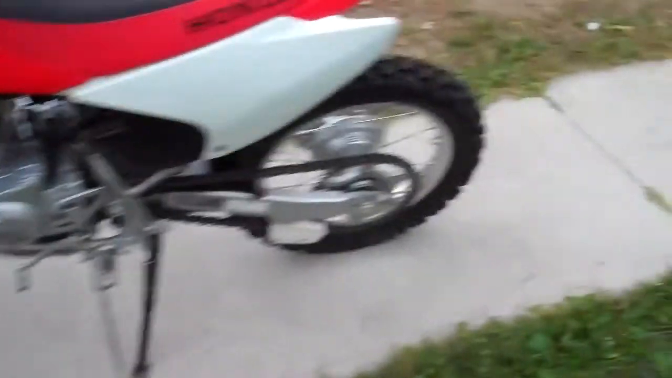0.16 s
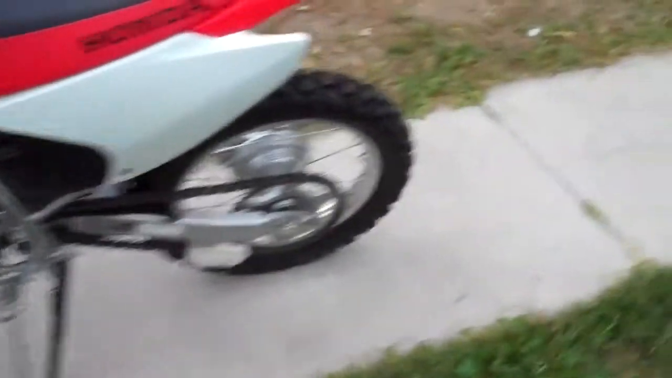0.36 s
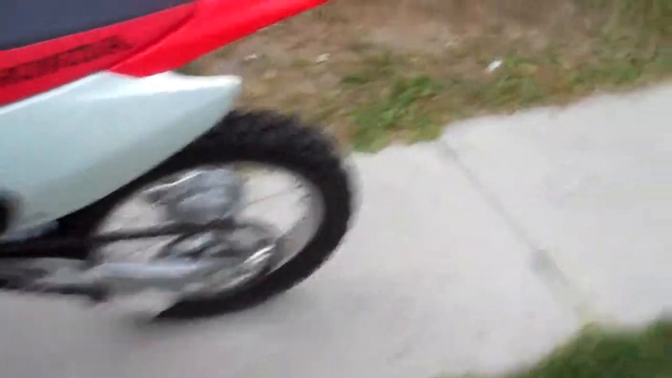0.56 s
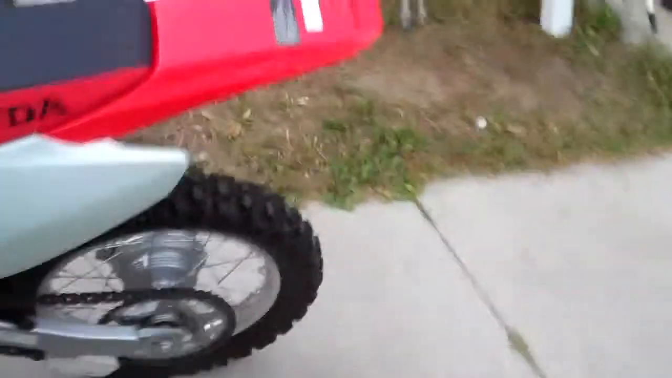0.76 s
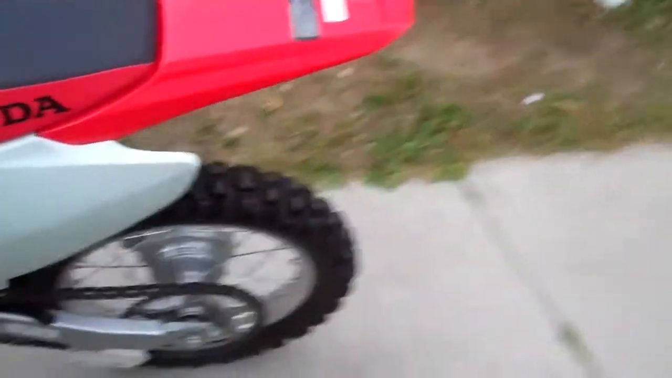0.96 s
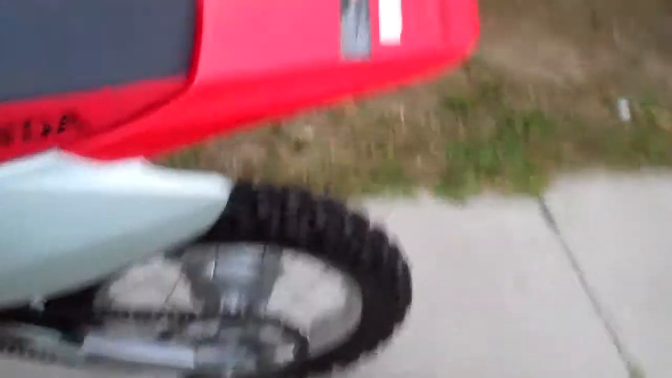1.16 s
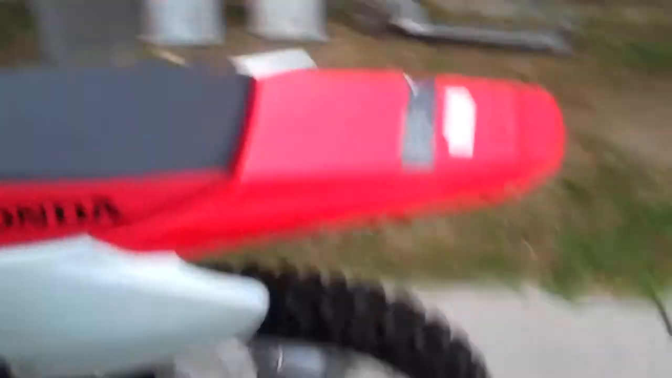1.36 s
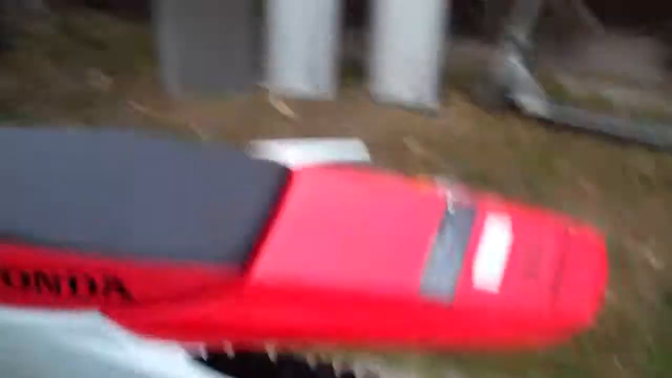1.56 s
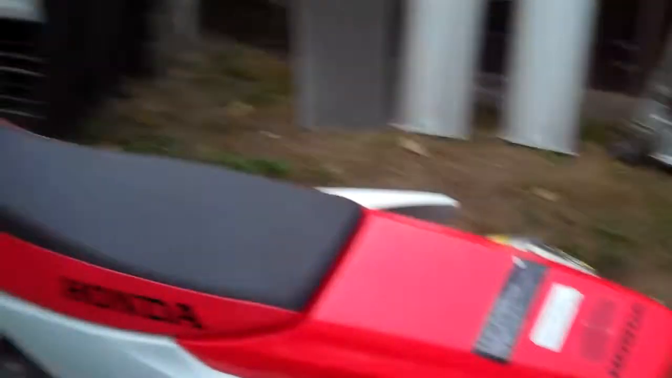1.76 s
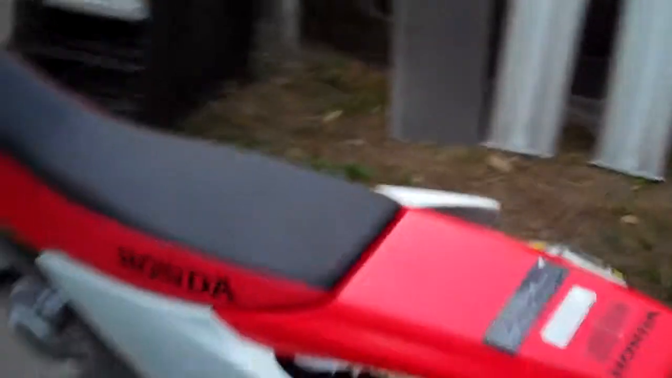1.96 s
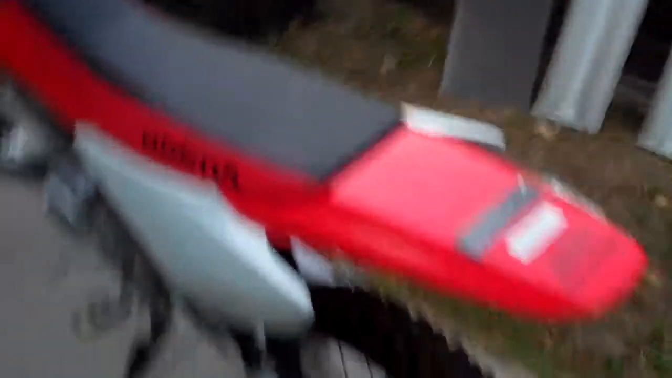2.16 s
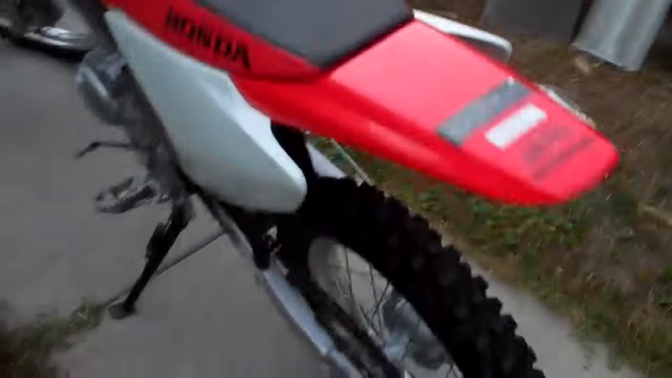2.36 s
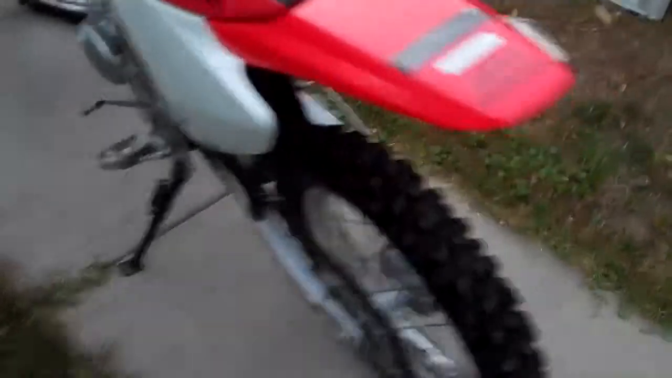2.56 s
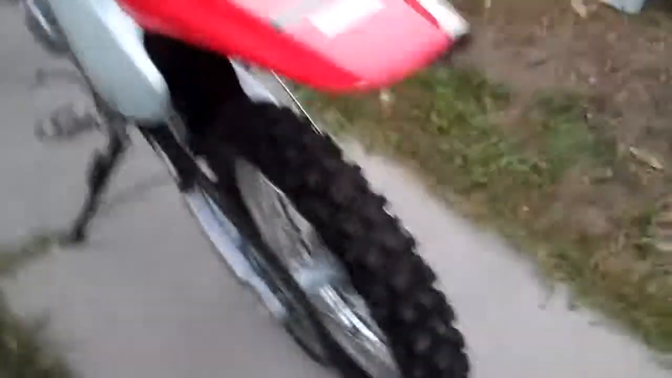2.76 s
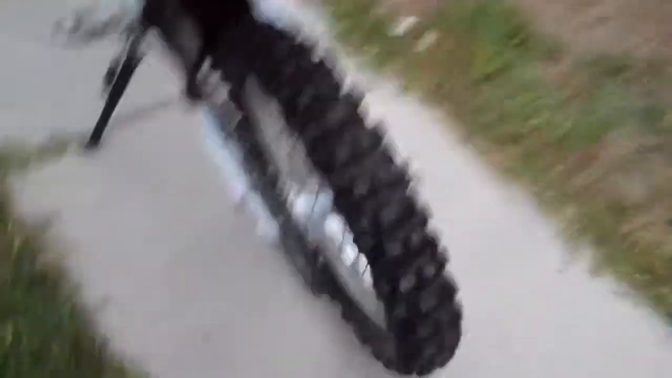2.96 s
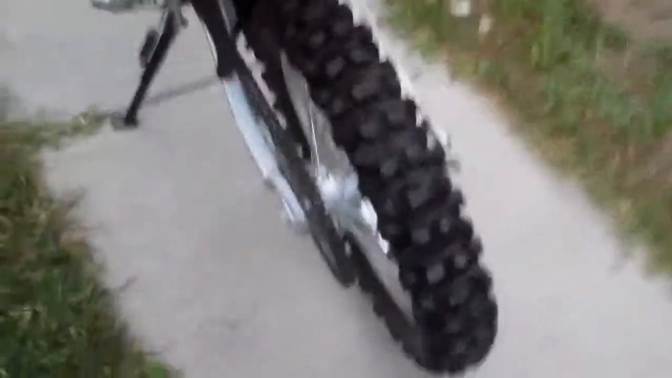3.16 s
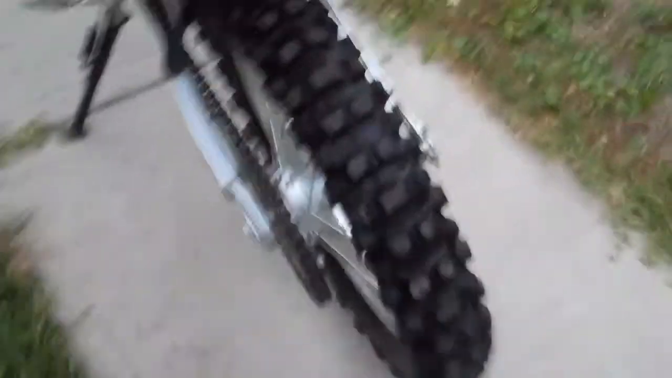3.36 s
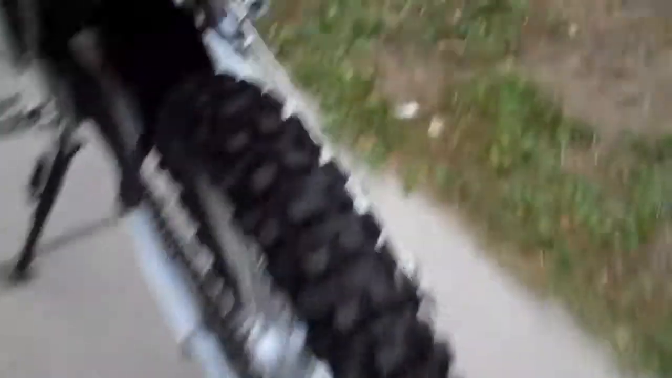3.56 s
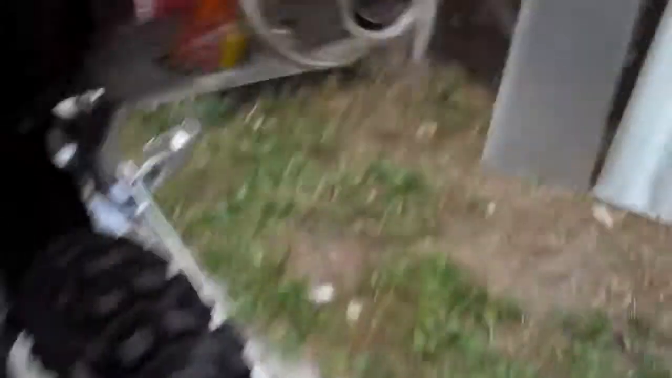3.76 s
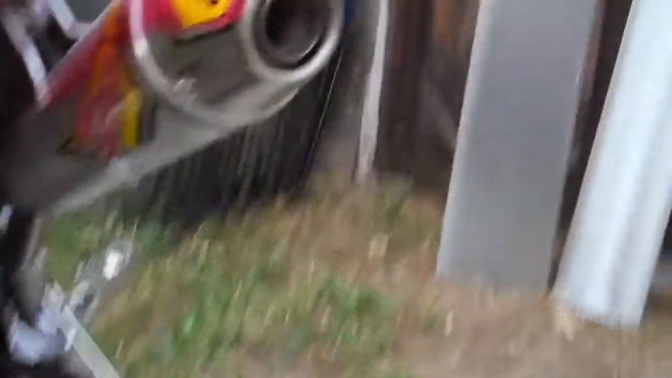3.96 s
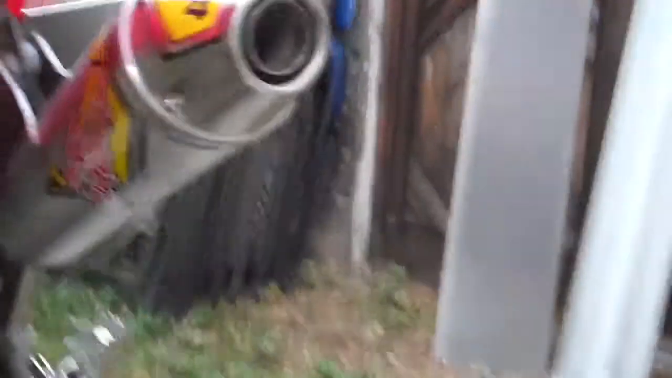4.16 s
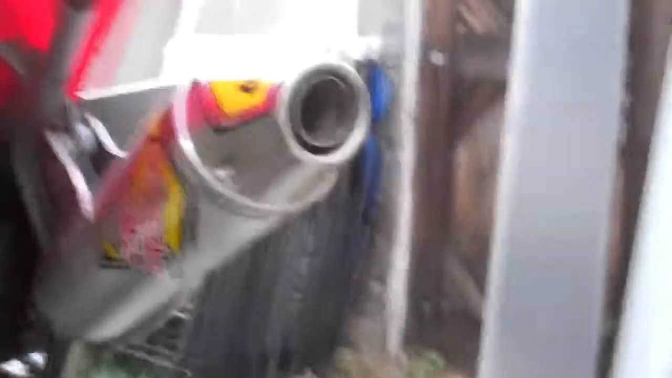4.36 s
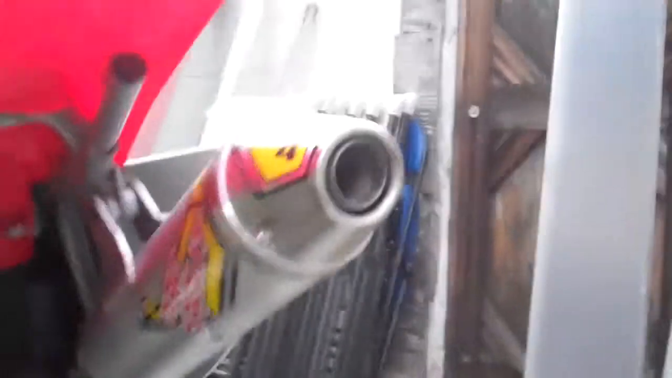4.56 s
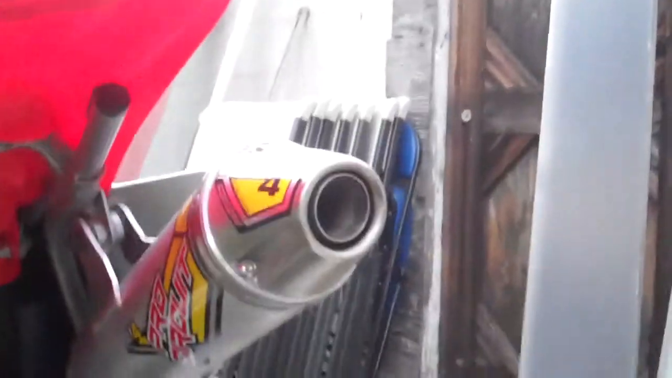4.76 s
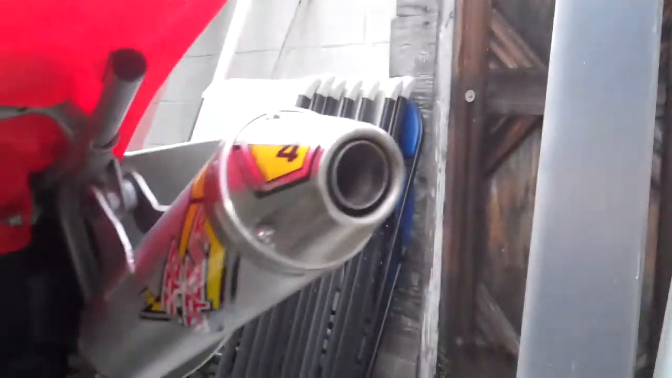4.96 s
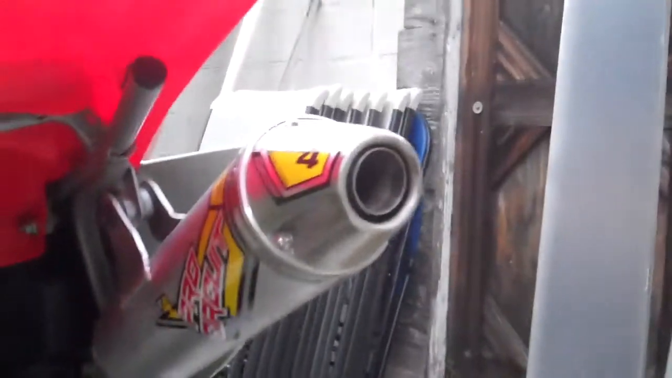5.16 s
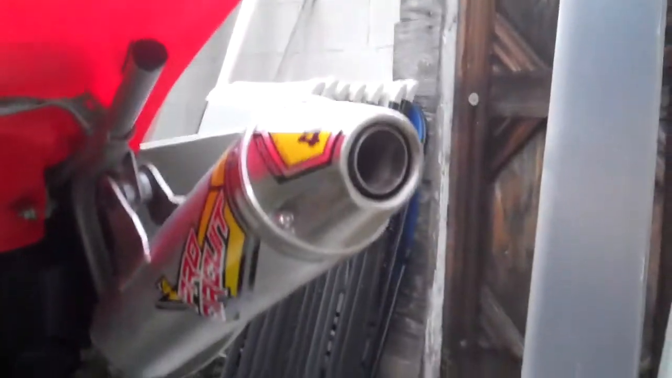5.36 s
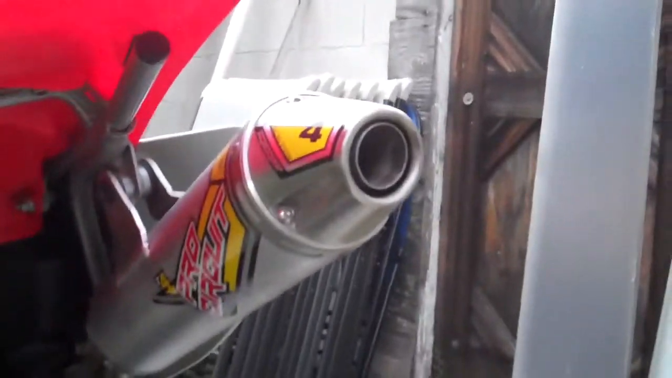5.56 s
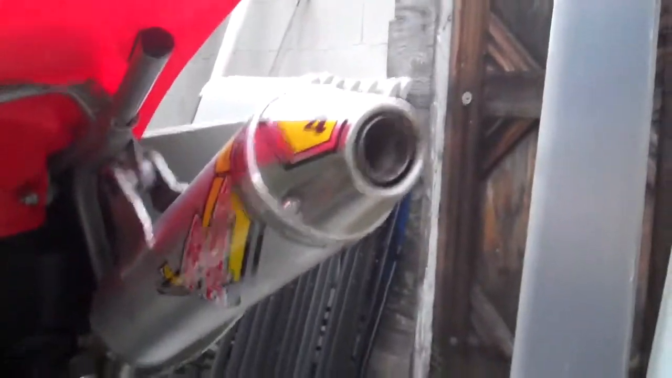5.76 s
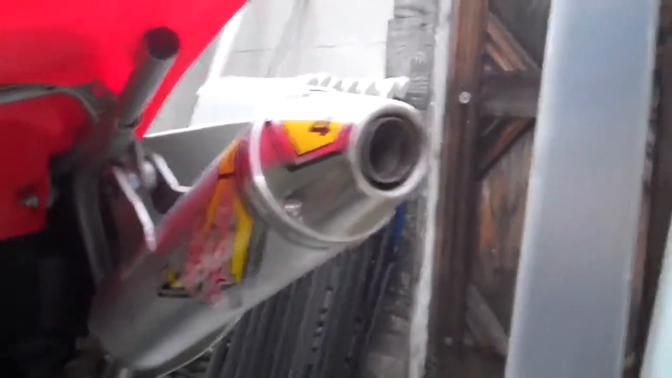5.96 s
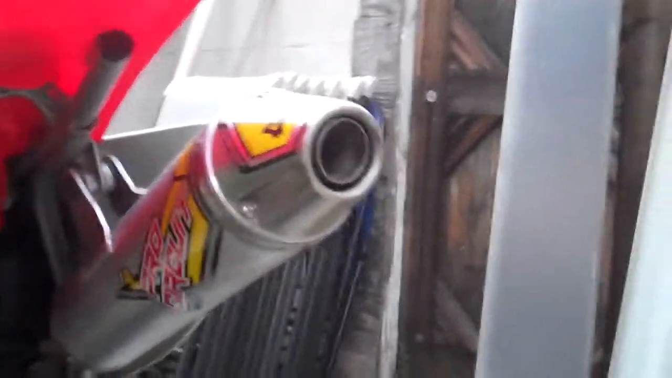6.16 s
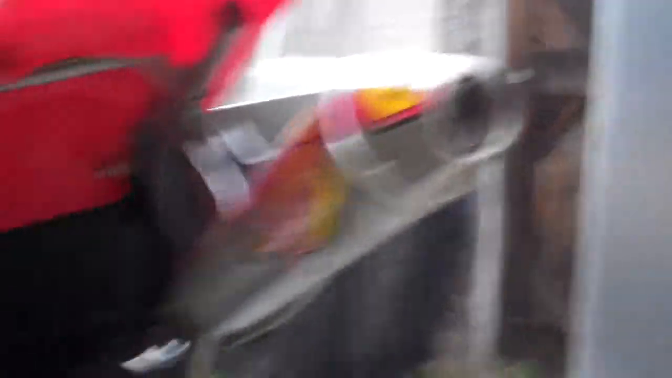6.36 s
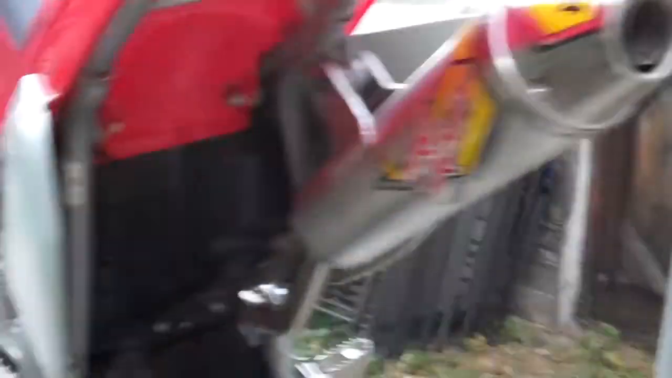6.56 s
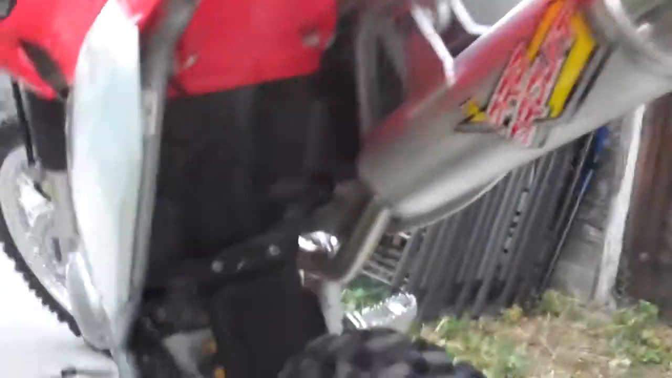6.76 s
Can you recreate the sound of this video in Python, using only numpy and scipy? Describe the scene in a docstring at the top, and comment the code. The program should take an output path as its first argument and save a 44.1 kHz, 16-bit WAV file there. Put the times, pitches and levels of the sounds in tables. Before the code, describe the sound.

Outdoors, a small four-stroke engine putters unevenly, its hollow exhaust beats swelling close by, with light pops and a few shoe scuffs on concrete.

```python
"""On a concrete path, a cold single-cylinder four-stroke idles, heard while walking round it to the silencer.
Each exhaust stroke rings the pipe: a blast when the charge burned, a softer gulp of air when it did not.
Gas hisses and rasps at the outlet, and the valve gear and cases clatter through each cycle.
Late pops and blast echoes knock the silencer shell, while shoes scuff and tap on the path."""
import sys
import numpy as np
from scipy import signal
from scipy.io import wavfile
from scipy.ndimage import uniform_filter1d

SR = 44100
rng = np.random.default_rng(int(sys.argv[2]) if len(sys.argv) > 2 else 0)


def materialize(psi):
    """Save the field psi as 16-bit PCM at rate SR to the path in sys.argv[1].

    A 1-D psi becomes a single channel; in a 2-D psi each row is a channel.
    """
    bounded = np.clip(np.atleast_2d(psi).T, -1, 1)
    quanta = np.round(bounded * 32767).astype(np.int16)
    wavfile.write(sys.argv[1], SR, quanta)


N = 300321

# Ringing notes of the pipe and silencer. Each row: pitch in Hz, relative level in dB, sign at the outlet
# (1 or -1), time to fade by 60 dB in seconds.
PIPE_MODES = [(52.1, -17.1, 1, .137), (81.4, -17.3, 1, .064), (115.3, -20.3, -1, .2), (153.4, -36, 1, .084),
              (263.8, .9, -1, .0368), (276.9, -4, 1, .0688), (320, -17, 1, .075), (366, -22, -1, .17)]
# The walk round the bike. Each row: time in seconds, strength of a full burn in dB, relative outlet hiss of
# such a burn in dB, relative clatter in dB, place from beside the cases (0) to behind the outlet (1).
WALK_ROUND = [(0, -6, -61, -47, 0.67), (.85, -5.5, -52, -48, 0), (1.6, -6.5, -65, -45.5, 0),
              (2.0, -4.5, -57, -45, 0.6), (2.75, -5, -61, -46, 0.38), (3.3, -3, -49, -46, 0.13),
              (3.7, 1, -46, -44, 0.58), (4.05, 4, -40, -44.5, 0.72), (5.0, 2.5, -46, -44, 0.84),
              (6.0, 2.5, -44, -44, 0.77), (6.81, 0.5, -48, -45, 0.77)]
# Broad colour of the clatter. Each row: centre in Hz, width of each filter pass in Hz, relative level from
# beside in dB, relative level from behind in dB.
CASE_COLOURS = [(225, 160, -0.5, -21), (313, 146, 0, -5), (511, 390, -4, -4.5), (810, 370, 6, 4.5),
                (1137, 426, 3, 3), (1500, 405, 2.5, -2), (1910, 870, 0, 2), (2640, 990, 0.5, -2),
                (3320, 2300, 0.5, 1), (3940, 2050, -2, 1), (5500, 790, -11, -27), (7160, 2300, -16, -40),
                (9150, 6500, -13, -21), (13000, 9700, -19.5, -19.5)]
# Clatter through one cycle. Each row: share of the cycle since the exhaust valve opened (0 to 1),
# relative level in dB.
CYCLE_LEVELS = [(0, 1.5), (.14, 2.5), (.22, -1), (.4, 1.5), (.5, 0), (.75, -1), (.84, -2.5), (.9, 4)]
# Late pops of unburned charge in the silencer. Each row: start in seconds, relative strength in dB.
LATE_POPS = [(2.106, -46), (3.499, -34), (3.915, -28.5), (4.121, -40), (4.361, -32.5), (5.86, -31.5),
             (6.083, -34.5)]
# Exhaust strokes after a burn. Each row: valve opening in seconds, strength in dB.
BURN_STROKES = [(0.1744, -11.5), (0.398, -12), (0.6114, -11), (0.823, -9), (1.04, -8), (1.2521, -8.5),
                (1.361, -7), (1.5786, -6), (1.6732, -23), (1.785, -6.5), (1.8845, -13.5), (1.9946, -6),
                (2.2162, -6), (2.321, -7.5), (2.435, -5.5), (2.6526, -6), (2.7519, -9.5), (2.8602, -5),
                (2.9597, -5.5), (3.0638, -4.5), (3.1733, -6), (3.285, -4.5), (3.3902, -3.5), (3.6096, -2.5),
                (3.7022, -3), (3.8039, -0.5), (4.026, 1.5), (4.1367, 0.2), (4.2466, 1.5), (4.348, -3),
                (4.455, 1.5), (4.5653, -20), (4.6679, 1.5), (4.8901, 0.7), (5.1096, 1), (5.2074, -1.5),
                (5.3122, 1), (5.4161, -4), (5.53, 1), (5.6316, -14), (5.7487, 0), (5.9709, 0.8),
                (6.071, -3.5), (6.1765, -1.0), (6.2818, -9), (6.398, 0.1), (6.5017, -14), (6.6173, -0.7)]
# Exhaust strokes after a misfire, with air drawn back up the pipe. Each row: valve opening in seconds,
# strength in dB.
MISFIRE_STROKES = [(0.0465, -17.5), (0.278, -15.5), (0.495, -15.5), (0.709, -12), (0.9242, -14),
                   (1.1364, -13.5), (1.4594, -20), (2.0955, -12), (2.5344, -15), (3.492, -9),
                   (3.9058, -3.5), (4.767, -22), (4.992, -3.5), (5.8521, -4.5), (6.7133, -7.5)]
# Covers and fins that ring when the valve gear knocks. Each row: pitch in Hz, time to fade by 60 dB in
# seconds, relative level from beside in dB, relative level from behind in dB.
FIN_MODES = [(361, 0.045, -3, 0), (783, 0.075, 2, -16.5), (1024, 0.051, -13, 1), (1175, 0.079, -34, 3),
             (1530, 0.16, -32, -12), (1964, 0.078, -5.5, -10), (2488, 0.073, -16, -10.5),
             (2890, 0.2, -27, -12), (3262, 0.047, -3, -8.5), (3610, 0.019, -7, -8),
             (4440, 0.079, -10, -18.5), (5250, 0.059, -32, -10)]
# Ringing notes of the silencer shell. Each row: pitch in Hz, relative level in dB, time to fade by 60 dB
# in seconds.
SHELL_MODES = [(530, -8.5, 0.06), (774, -5.5, 0.054), (946, 0.5, 0.025), (1223, -9, 0.06),
               (1787, -9, 0.036)]
# Shoes dragged on concrete. Each row: start in seconds, relative level in dB, pitch of the scrape in Hz.
SHOE_SCUFFS = [(0.604, -45, 700), (1.933, -36.5, 306), (2.708, -41.5, 706), (3.386, -38, 1030)]
# Heels set down. Each row: start in seconds, relative level in dB, length in seconds.
HEEL_TAPS = [(0.819, -42.5, 0.031), (3.278, -44.5, 0.025), (3.383, -28, 0.012)]

BLAST_S, GULP_S = .0046, .0063  # length of each pressure pulse, seconds
# hiss lost per dB a burn falls short of full, the most it can lose, and the relative hiss of a gulp
HISS_DB_PER_DB, HISS_LOSS_DB, GULP_HISS_DB = 3, 28, -6
MURMUR_DB_PER_DB = 0.56  # growth of the pipe murmur per dB of a full burn
CRACK_DB, CRACK_S = -17, .0035  # bright crack of a pop against its knock, and its decay time constant
SCUFF_S, GRIT_RATIO, GRIT_DB = .16, 2.78, -2.5  # scuff length; grit pitch and level against the sole
TAP_HZ = 1000
TOP_HZ = 14350  # upper edge of what the microphones pass


def undb(db):
    """Gain of a level in dB."""
    return 10 ** (np.asarray(db) / 20)


def unit(x):
    """Scaled to an average (rms) strength of 1."""
    return x / np.sqrt(np.mean(x ** 2))


def ring(x, hz, t60):
    """One note struck by x, fading by 60 dB in t60 seconds."""
    pole = np.exp((2j * np.pi * hz - np.log(1000) / t60) / SR)
    return signal.lfilter([1], [1, -pole], x).imag


def band(x, hz, width):
    """Resonance with gain 1 at its centre."""
    return signal.lfilter(*signal.iirpeak(hz, hz / width, fs=SR), x)


def steep(x, hz, width):
    """The same resonance twice, so that little is left far from its centre."""
    return band(band(x, hz, width), hz, width)


def walk(rate):
    """Random wander: about rate new values a second, joined by straight slopes."""
    hold = int(SR / rate)
    steps_held = np.repeat(rng.standard_normal(N // hold + 1), hold)
    return uniform_filter1d(steps_held, hold)[:N]


def grit(scatter_db):
    """Dense small impacts of uneven size."""
    sizes = undb(scatter_db * rng.exponential(size=N))
    return unit(rng.standard_normal(N) * sizes)


def spread(mid, side, share):
    """Two channels that share mid and differ by side."""
    return (mid + share * side * np.array([[1], [-1]])) / np.sqrt(1 + share ** 2)


def apart(hz):
    """The two microphones agree in the bass and part in the treble."""
    return np.clip((hz / 7000) ** 0.79, .08, .75)


def pulse(n):
    """Smooth push of n samples whose total stays near 1 whatever its length."""
    return np.hanning(n) * 2 / n


def exhaust(full_db, hiss_db):
    """Pressure pulses ring the pipe; the flow at the outlet shapes the hiss and a rasp of the silencer."""
    push, jet = np.zeros(N), np.zeros(N)
    strokes = [(*row, 1, BLAST_S) for row in BURN_STROKES]
    strokes += [(*row, -1, GULP_S) for row in MISFIRE_STROKES]
    murmur_db = MURMUR_DB_PER_DB * full_db
    for s, db, sign, length in sorted(strokes):
        i, n = int(s * SR), int(length * SR)
        push[i:i + n] += sign * undb(db) * pulse(n)

        # a weak burn hisses far less than a full one
        over_db = db - full_db[i]
        if sign > 0:
            change_db = np.clip(HISS_DB_PER_DB * over_db, -HISS_LOSS_DB, 3)
        else:
            change_db = GULP_HISS_DB + over_db
        # the flow already carries the strength of the stroke, so take it off here
        jet[i:] = undb(hiss_db[i] + change_db - db)

        # the rising piston then shoves out what a weak stroke left in the cylinder
        spent = undb(over_db) if sign > 0 else 0
        left_over = np.clip(1 - spent, 0, 1)
        j, n = int((s + length + 0.011) * SR), int(0.015 * SR)
        push[j:j + n] += left_over * undb(murmur_db[i] - 13) * pulse(n)

    # eddies in the pipe keep its notes murmuring
    eddies = undb(murmur_db - 56 + 4.5 * walk(11)) * steep(rng.standard_normal(N), 81, 104)
    boom = sum(sign * undb(db) * ring(push + eddies, hz, t60) for hz, db, sign, t60 in PIPE_MODES)

    # gas leaving the outlet hisses more than air drawn back in
    swing = signal.sosfilt(signal.butter(2, 60, "high", fs=SR, output="sos"), boom)
    flow = uniform_filter1d(np.where(swing > 0, swing, -.6 * swing), size=120)
    hiss = undb(28.0) * steep(rng.standard_normal((2, N)), 5300, 13000) * flow * jet
    hiss = spread(*hiss, 0.4) * undb([[.6], [-.6]])  # a little stronger on the left

    # the rasp follows one pipe round trip later
    late_flow = np.roll(flow, int(0.0055 * SR))
    rasp = undb(-4) * steep(rng.standard_normal(N) * late_flow, 850, 890)
    return boom + rasp + hiss


def clatter(t, db, behind):
    """Valve gear, chain and piston knock the cases, hardest just before the exhaust valve opens."""
    opens = np.sort([row[0] for row in BURN_STROKES + MISFIRE_STROKES])
    phase = np.interp(t, opens, np.arange(len(opens))) % 1
    beat_db = np.interp(phase, *np.transpose(CYCLE_LEVELS), period=1) + 1.62 * walk(30)
    wash, bells = 0, 0
    for hz, width, beside_db, behind_db in CASE_COLOURS:
        tone = unit(steep(np.array([grit(1.36), grit(1.0)]), hz, width))
        colour_db = beside_db + behind * (behind_db - beside_db) + 1.34 * walk(25)
        wash = wash + undb(colour_db) * spread(*tone, apart(hz))
    for hz, t60, beside_db, behind_db in FIN_MODES:
        # each part is struck in its own short flurries
        flurry_db = 8.4 * np.tanh(0.54 * walk(60)) + 2.07 * np.clip(beat_db, -9, 4)
        flurry = undb(flurry_db) * rng.standard_normal((2, N))
        colour_db = beside_db + behind * (behind_db - beside_db)
        bells = bells + undb(colour_db) * spread(*unit(ring(flurry, hz, t60)), apart(hz))
    return undb(db) * (undb(beat_db) * unit(wash) + undb(-3.0) * unit(bells))


def pops():
    """Late burns, and the steepened echo of each blast, strike the silencer shell."""
    # a stronger blast steepens more on its way back down the pipe
    echoes = [(s + .0095, 1.62 * db - 34.0) for s, db in BURN_STROKES]
    hits = np.array(LATE_POPS + echoes)
    at = (hits[:, 0] * SR).astype(int)
    # every hit stirs the notes of the shell in its own mixture
    mix_db = hits[:, 1:] + 3.6 * rng.standard_normal((len(hits), len(SHELL_MODES)))
    kicks = np.zeros((len(SHELL_MODES), N))
    kicks[:, at] = undb(mix_db).T
    knock = sum(undb(db) * ring(kick, hz, t60) for kick, (hz, db, t60) in zip(kicks, SHELL_MODES))

    # only the late pops add a bright crack
    count = len(LATE_POPS)
    starts = np.zeros(N)
    starts[at[:count]] = undb(hits[:count, 1] + CRACK_DB)
    fade = signal.lfilter([1], [1, -np.exp(-1 / (CRACK_S * SR))], starts)
    crack = fade * steep(rng.standard_normal((2, N)), 7000, 11000)
    return knock + spread(*crack, .4)


def steps(t):
    """A sole drags, with finer grit above it, or a heel taps: a sudden start and a fading scrape."""
    sounds = [(s, db, length, TAP_HZ) for s, db, length in HEEL_TAPS]
    for s, db, hz in SHOE_SCUFFS:
        sounds.append((s, db, SCUFF_S, hz))
        sounds.append((s, db + GRIT_DB, SCUFF_S, GRIT_RATIO * hz))
    out = 0
    for s, db, length, hz in sounds:
        scrape = unit(steep(np.array([grit(1.6), grit(1.7)]), hz, hz))
        scrape = scrape * undb(2 * walk(80))
        start = np.clip((t - s) / 0.00082, 0, 1)
        fade = np.exp(-3 * (np.maximum(t - s, 0) / length) ** 2)  # down to 5 % after one length
        out = out + undb(db) * start * fade * spread(*scrape, 0.34)
    return out


def scene():
    """Everything that reaches the two microphones."""
    t = np.arange(N) / SR
    s, *columns = np.transpose(WALK_ROUND)
    full_db, hiss_db, clatter_db, behind = (np.interp(t, s, c) for c in columns)
    engine = exhaust(full_db, hiss_db) + clatter(t, clatter_db, np.clip(behind, 0, 1))
    return engine + pops() + steps(t)


def record(dry):
    """Both microphones lose the deep bass, the left one more; the top is cut."""
    left, right = signal.sosfilt(signal.butter(2, 57.6, "high", fs=SR, output="sos"), dry)
    left = undb(-0.13) * signal.lfilter(*signal.butter(1, 30, "high", fs=SR), left)
    right = np.roll(right, 1)  # its port lies about a centimetre further off
    return signal.sosfilt(signal.ellip(10, .2, 60, TOP_HZ, fs=SR, output="sos"), [left, right])


dry = scene()
out = record(dry)
materialize(out)
```